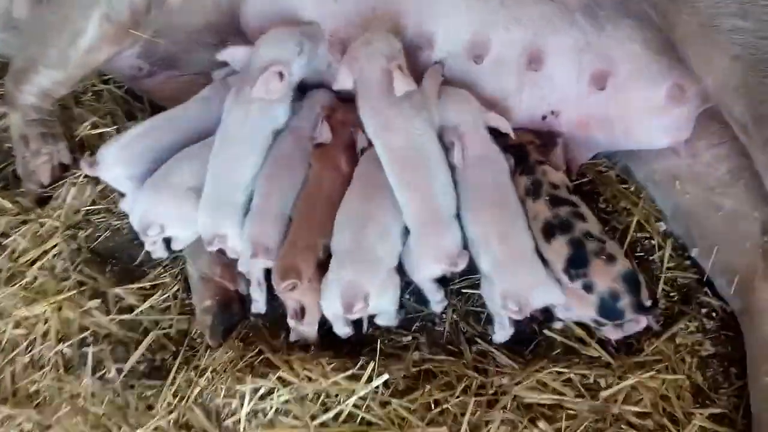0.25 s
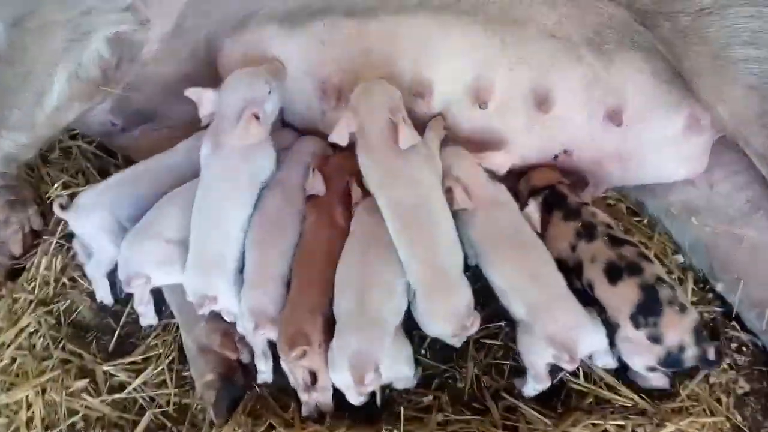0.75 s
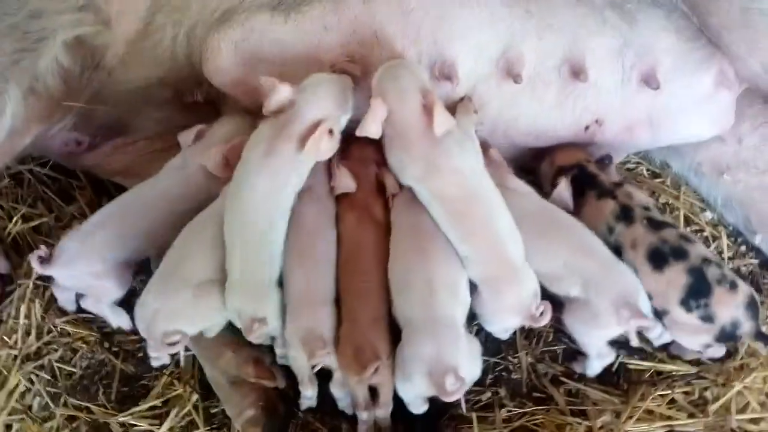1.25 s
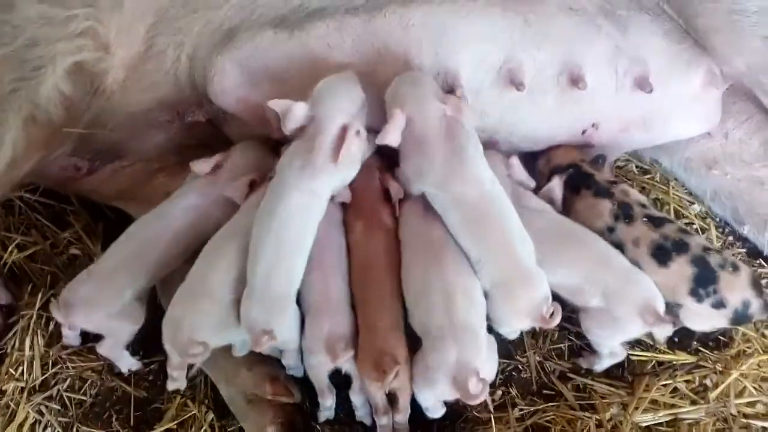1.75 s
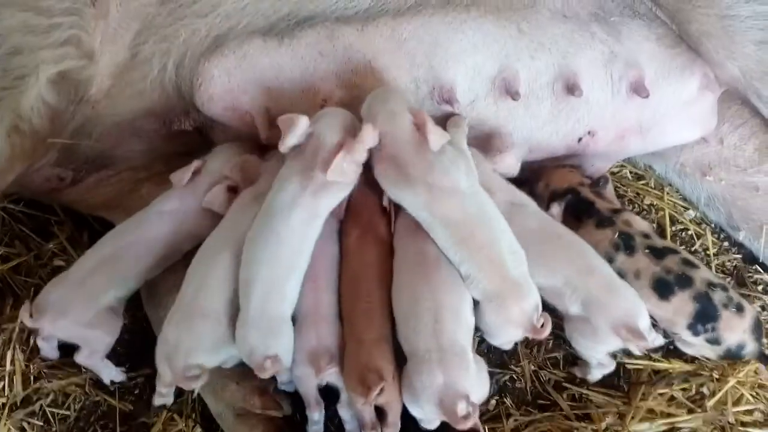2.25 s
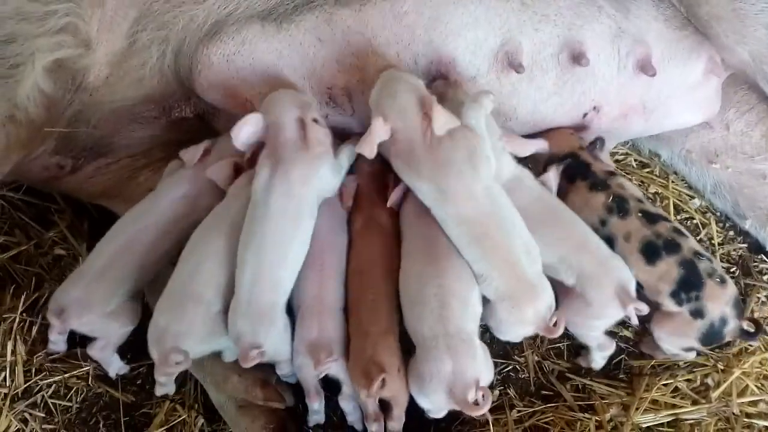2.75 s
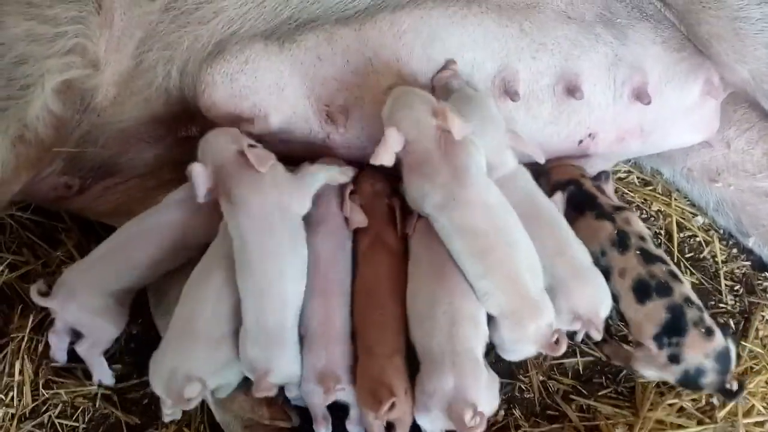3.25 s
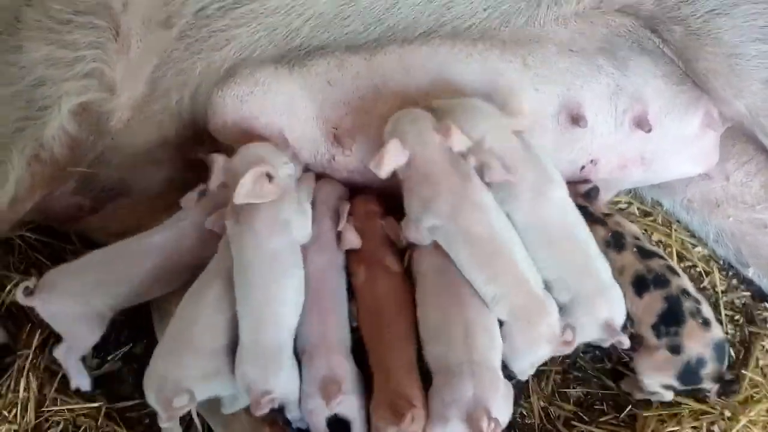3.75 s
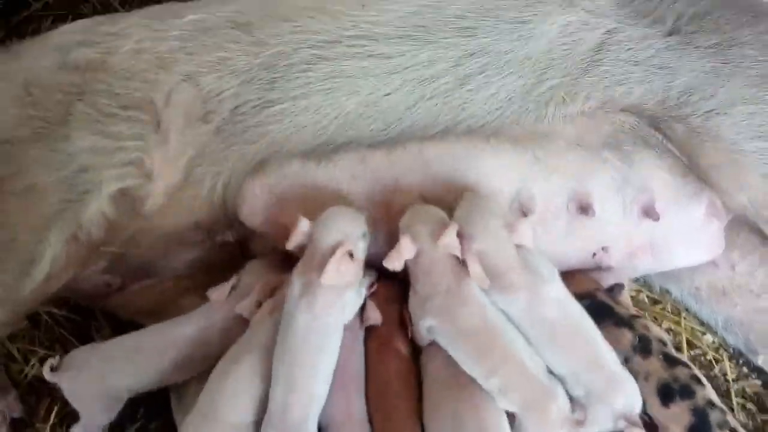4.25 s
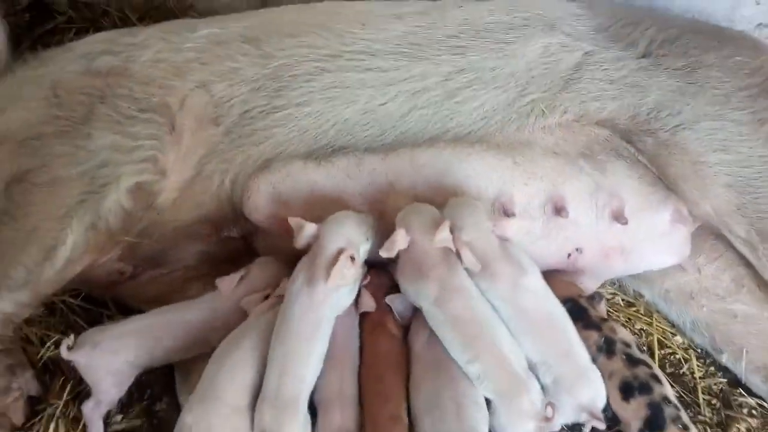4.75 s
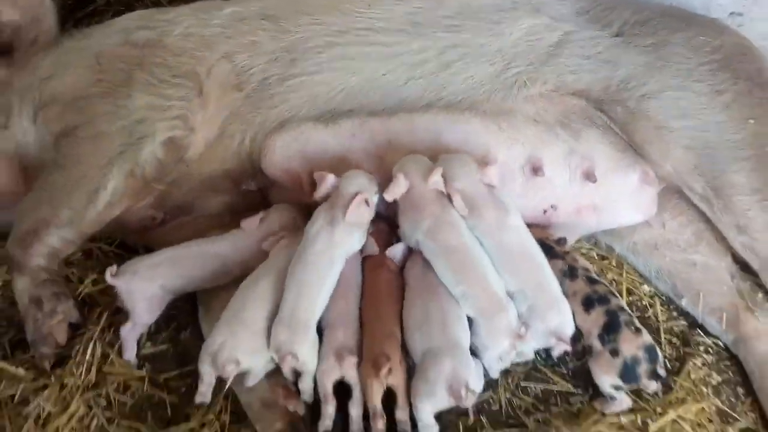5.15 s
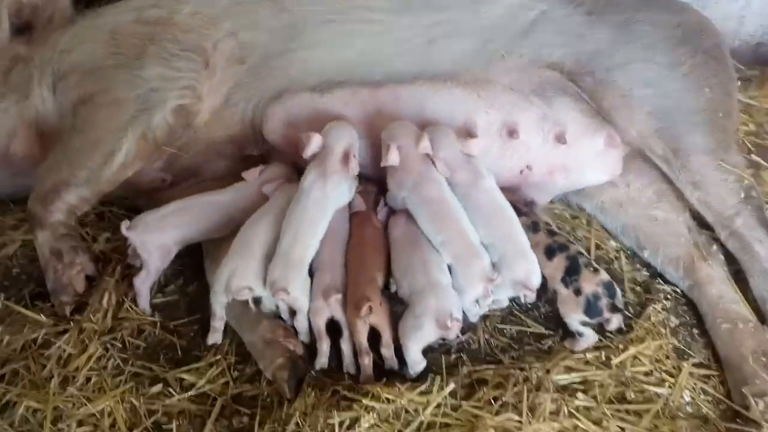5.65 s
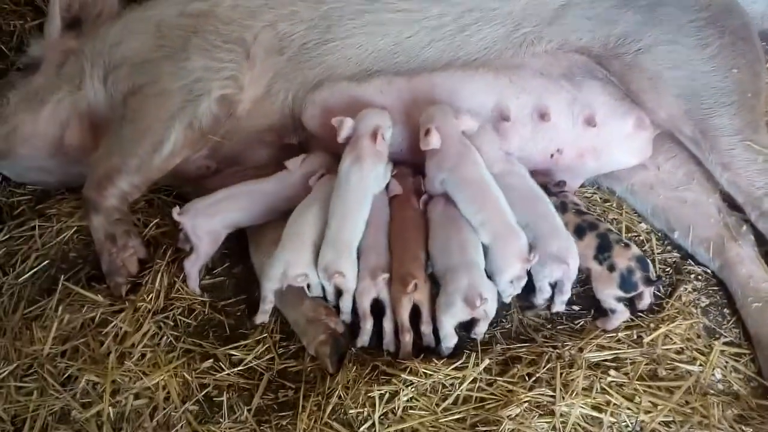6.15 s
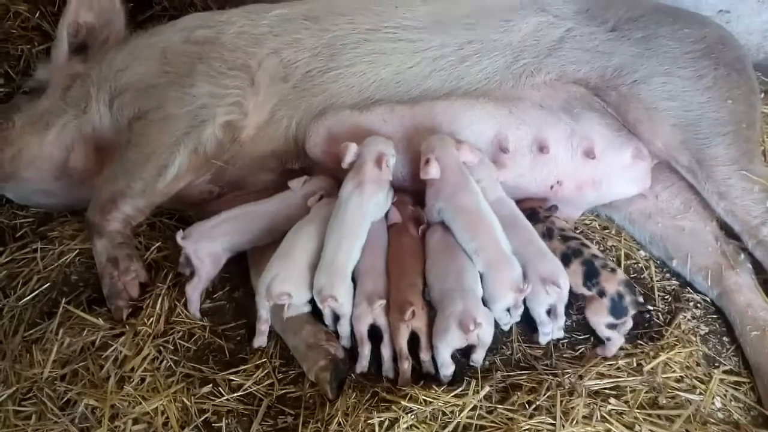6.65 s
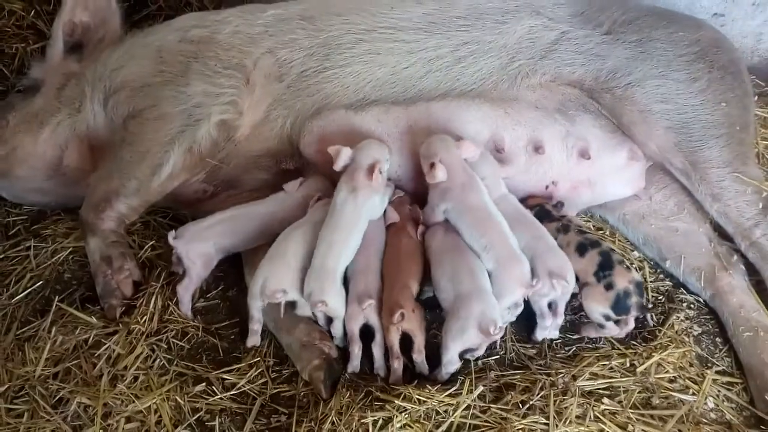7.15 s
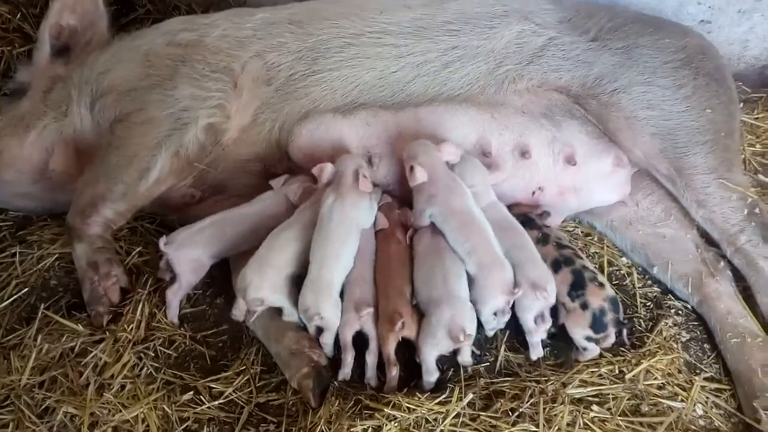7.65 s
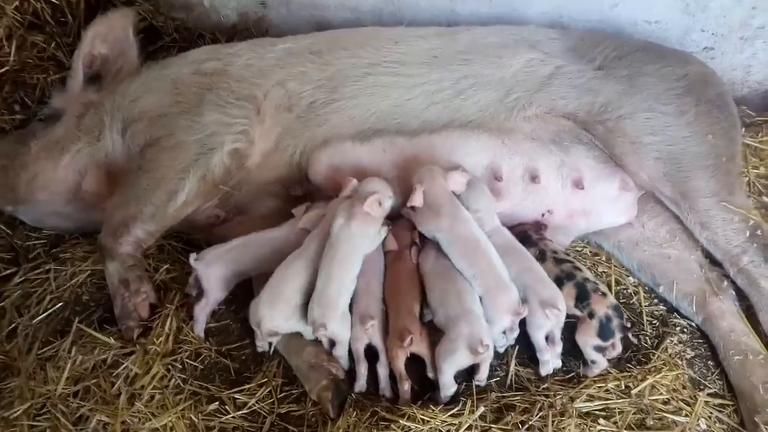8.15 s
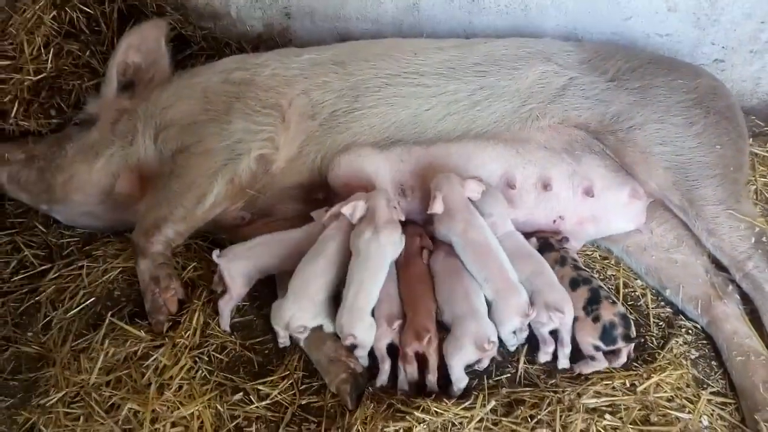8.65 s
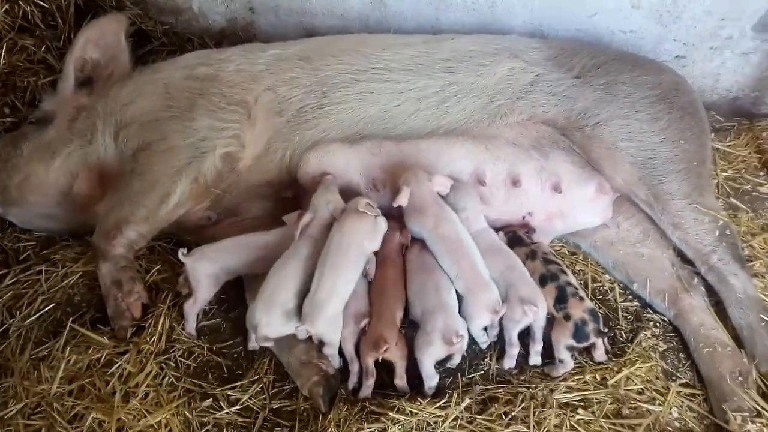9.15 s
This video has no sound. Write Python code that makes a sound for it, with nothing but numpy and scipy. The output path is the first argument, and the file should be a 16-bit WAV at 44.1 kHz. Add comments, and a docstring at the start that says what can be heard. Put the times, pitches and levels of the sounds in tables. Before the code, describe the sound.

Heard from above in a farm pen, a nursing sow makes deep, nasal grunts that start irregularly and settle into an even rhythm, about twice a second. Small nose whistles and breathy creaks go with them. Much quieter, her piglets smack now and then, rustle the straw and later give a few tiny husky grunts. The hard walls add a brief echo over a faint hum.

```python
"""A sow lies in straw and suckles her piglets, heard from above in a hard-walled pen with a faint hum.
Straw rustles, her nostril rings, and she starts grunting about twice a second. Each grunt is a short
run of slow throbs: it starts nasal, surges, opens to its peak and fades. The vowel swells and rises
in the first throbs, a slack throat sounds deeper, and her nose often chirps. Piglets shuffle, a soft
creak leads into most grunts, and the piglets smack at the teats, later giving a few small husky grunts."""
import sys
import numpy as np
from scipy import signal
from scipy.fft import rfft, irfft, next_fast_len
from scipy.io import wavfile
from scipy.ndimage import uniform_filter1d, map_coordinates

SR = 44100
rng = np.random.default_rng(int(sys.argv[2]) if len(sys.argv) > 2 else 0)


def transcribe(signal):
    """Save signal, clipped to [-1, 1], as a 16-bit WAV file at the path in sys.argv[1]."""
    frames = np.atleast_2d(signal).T
    limited = np.clip(frames, -1, 1)
    pcm = np.round(limited * 32767).astype(np.int16)
    wavfile.write(sys.argv[1], SR, pcm)


N = 414128

# the quiet of the barn: (frequency [Hz], level [dB])
AIR_TONE = [(15, -53), (25, -10), (136, 3), (1200, -7.5), (1570, -8), (1800, -9.5), (2170, -6), (2420, -13),
            (3000, -14.5), (4870, -17.5), (5580, -27), (8350, -32), (15500, -31)]
# stalks rubbing together: (frequency [Hz], level [dB])
SWISH_TONE = [(500, -0.5), (1500, 4.5), (2400, -7.5), (3600, -0.5), (5000, 1), (6500, -4), (7400, -12.5),
              (8200, -18.5), (11000, -26.5), (15000, -47)]
# dry stalks splintering: (frequency [Hz], level [dB])
SPLINTER_TONE = [(2000, -24.5), (4500, -2), (7000, 5), (11000, -8), (15000, -15)]
# a piglet shifts its feet: (loudest time [s], length [s], level [dB], crackle offset [dB])
FOOT_SHUFFLES = [(0.14, 0.2, -73, -19), (0.46, 0.69, -72.5, -21.5), (1.065, 0.11, -59, -6.5),
                 (1.325, 0.07, -61, -25.5), (1.589, 0.14, -57.5, -21.5), (1.97, 0.049, -66, -24),
                 (2.234, 0.17, -68.5, -16.5), (2.71, 0.19, -65.5, -19.5), (3.065, 0.1, -61.5, -22),
                 (3.451, 0.063, -57.5, -11), (3.558, 0.24, -70, -18.5), (3.878, 0.21, -65, -22.5),
                 (4.072, 0.079, -66, -13.5), (4.476, 0.36, -70, -22.5), (4.912, 0.08, -54.5, -13),
                 (5.191, 0.15, -68.5, -8), (5.584, 0.11, -70, -17.5), (6.007, 0.083, -68.5, -10.5),
                 (6.243, 0.033, -73, -17.5), (6.491, 0.089, -72.5, -9.5), (7.334, 0.056, -70.5, -2.5),
                 (7.758, 0.32, -69.5, -18.5), (8.586, 0.11, -61, -22.5), (8.889, 0.092, -63, -8.5),
                 (9.088, 0.1, -61.5, -22.5), (9.316, 0.057, -65.5, -23.5)]
# a narrowed nostril rings: (time [s], length [s], level [dB], pitch [Hz])
NOSTRIL_RINGS = [(0.0, 0.17, -53.5, 2650), (1.12, 0.091, -57, 2780)]
# the sow's grunts; "bite" is extra treble, and posture runs from 0 (nasal) through 1 (open) to 2 (slack):
# (start time [s], opening time [s], start level [dB], surge level [dB], open level [dB], drop after [dB],
#  start bite [dB], surge bite [dB], open bite [dB], brightness [dB], start posture, open posture,
#  start vowel ring [dB], surge vowel ring [dB])
SOW_GRUNTS = [(0.012, 0.09, -33, -24.5, -25, -8.5, 10, 2, 4.5, 2, 0.73, 0.93, -63, -50),
              (0.582, 0.656, -26.5, -30.5, -25.5, -13.5, 1.5, -1, -3, -9, 0.65, 0.79, -43.5, -44),
              (1.121, 1.197, -35.5, -27, -23.5, -18, 5.5, -3.5, 2, -7, 2.2, 1.6, -43, -44),
              (1.324, 1.41, -38, -39, -32.5, -8.5, 6, 1, 4, 4, 1.93, 1.9, -53, -52.5),
              (1.489, 1.567, -36.5, -38, -34.5, -3.5, 2, 11, -2, 7, 2.1, 1.95, -57.5, -49.5),
              (1.785, 1.864, -44, -31, -29, -5.5, 14, -1, 3, -2, 2, 2.1, -54, -53),
              (2.034, 2.112, -36.5, -34, -29.5, -13, 4, 1, 0.5, 1, 1.8, 1.58, -70, -58.5),
              (2.661, 2.737, -40, -30, -28.5, -3.5, 7, 3.5, 7.5, 10, 0.9, 1.25, -48, -47),
              (3.312, 3.387, -34, -27.5, -24, -1.5, 7.5, 0.5, 4.5, -5.5, 0.78, 1.05, -41, -42),
              (3.798, 3.873, -32, -26.5, -24, -11, -5.5, 2, 4, 7, 0.82, 0.9, -56.5, -48.5),
              (4.269, 4.344, -33.5, -29, -25.5, -7, -3.5, 1, 4.5, -1, 0.82, 1.1, -43.5, -41.5),
              (4.749, 4.824, -34.5, -27, -25, -17, 6.5, -0.5, 1.5, 7, 0.85, 0.98, -43, -45),
              (5.232, 5.304, -30, -26, -25, -15, -1, 4, 2, 4.5, 0.4, 1.2, -40, -40.5),
              (5.647, 5.723, -35, -27.5, -28.5, -0.5, 9, 1.5, 4, 4, 0.23, 0.97, -50, -42),
              (6.119, 6.193, -31, -23.5, -22.5, -14, -4, 1, 2.5, 8, 0.25, 1.15, -49, -46),
              (6.55, 6.617, -29.5, -26, -25.5, -12, 6, 2, 1, -3, 0.1, 1.08, -45, -45.5),
              (7.016, 7.091, -32, -24, -23, -15, -5, 1.5, 3, -2, 0.087, 0.96, -65, -43.5),
              (7.474, 7.546, -34, -23, -23.5, -9.5, -9, -3, 1.5, 1.5, 0.13, 1.02, -63, -43),
              (7.985, 8.06, -28.5, -23, -24, -19.5, -3.5, -3.5, 8, 4, 0.22, 1.1, -47.5, -39),
              (8.444, 8.515, -31, -24.5, -23.5, -13, -7, 1.5, -2, 8.5, 0.14, 1.02, -58.5, -41),
              (8.929, 9.003, -34.5, -24.5, -23, -14, 8.5, 5, -2, 6, 0.11, 0.9, -56, -39.5)]
# her resonances (pitches her throat rings at) in each posture: (frequency [Hz], width [Hz], level [dB])
NASAL_THROAT = [(80, 370, -12), (200, 130, -6.5), (355, 120, -6.5), (522.6, 110, -12), (779, 360, -18.5),
                (1083.6, 110, -20), (2358, 120, -29.5), (3500, 120, -59), (4570, 150, -35),
                (6030, 220, -45)]
OPEN_THROAT = [(87, 250, -8.5), (228.2, 73, -5), (405, 474, -15), (476.4, 114, -4.5), (936, 130, -18.5),
               (1525.6, 272, -24.5), (2625, 790, -39), (3570, 500, -39.5), (4435, 280, -38.5),
               (5860, 330, -42)]
SLACK_THROAT = [(80, 890, -17), (226, 60, -2.5), (337, 400, -11.5), (460, 100, -2), (903.6, 55, -12),
                (1722, 570, -27), (2960, 180, -39.5), (3480, 400, -34.5), (4600, 250, -50),
                (5760, 440, -42.5)]
# her nose flutters open: (time [s], level [dB], pitch [Hz])
NOSE_CHIRPS = [(0.089, -36, 3140), (0.654, -34.5, 3260), (1.125, -32.5, 4400), (1.189, -40, 4520),
               (1.198, -34, 3060), (1.226, -37.5, 4420), (1.33, -36.5, 3320), (1.447, -39, 3340),
               (1.488, -37, 3420), (1.53, -36, 3250), (1.571, -39, 3370), (1.603, -35, 3430),
               (1.787, -42.5, 3340), (1.865, -38, 3200), (2.076, -43.5, 2900), (2.115, -37.5, 3460),
               (2.78, -47.5, 3380), (3.349, -35, 4450), (3.386, -28.5, 4380), (3.424, -34.5, 2840),
               (3.874, -32, 4440), (3.915, -36, 3370), (4.307, -41, 2520), (4.347, -39, 3190),
               (4.386, -42, 2990), (4.788, -43, 2700), (5.306, -39.5, 3180), (8.057, -35, 3370),
               (9.004, -35, 4570)]
# creaks behind her closed mouth: (time [s], length [s], level [dB], bite [dB])
SOW_CREAKS = [(0.462, 0.037, -41.5, -2), (0.545, 0.032, -33.5, 0.5), (1.016, 0.06, -45, -6),
              (1.701, 0.51, -47, -9), (2.553, 0.11, -44.5, -10), (3.017, 0.14, -51.5, -9),
              (3.218, 0.084, -43, -2.5), (3.71, 0.15, -39.5, -3), (4.169, 0.041, -39.5, -1),
              (4.647, 0.24, -44, 4), (5.11, 0.12, -43, -4), (5.198, 0.039, -35.5, -5.5),
              (5.51, 0.21, -44.5, -4), (5.883, 0.17, -44.5, -11), (6.081, 0.031, -31.5, -2),
              (6.429, 0.14, -40.5, -1), (6.912, 0.19, -41.5, 0), (7.345, 0.12, -41.5, -7),
              (7.88, 0.033, -37.5, 0), (7.952, 0.032, -34, 5.5), (8.333, 0.083, -40.5, -4.5),
              (8.841, 0.086, -40, 5.5), (9.319, 0.081, -38.5, 4.5)]
# lip smacks and snapping stalks: (time [s], level [dB], pitch [Hz])
LIP_SMACKS = [(0.467, -51, 4300), (0.846, -38, 3920), (1.014, -34, 1600), (1.023, -42, 5440),
              (2.516, -40.5, 4500), (4.031, -51, 3700), (5.077, -39, 1220), (6.913, -57, 4620),
              (7.313, -42, 4700), (7.419, -44, 4630), (7.694, -51, 4000), (9.299, -58, 5000)]
# piglet grunts: (time [s], length [s], level [dB], pulse rate [1/s])
PIGLET_GRUNTS = [(3.005, 0.046, -45.5, 152), (3.028, 0.037, -40.5, 253), (4.908, 0.022, -60, 190),
                 (5.514, 0.043, -51.5, 110), (5.929, 0.027, -44.5, 190), (6.845, 0.015, -52, 70),
                 (7.72, 0.015, -45.5, 223)]
# a piglet's throat: (frequency [Hz], width [Hz], level [dB])
SMALL_THROAT = [(616, 230, 9), (1000, 1200, -3.5), (1560, 350, -10), (1710, 170, -5.5), (4020, 500, -32)]
# how long the pen echoes: (frequency [Hz], time to fade by 60 dB [s])
ECHO_FADE = [(60, 0.81), (230, 0.8), (500, 0.4), (1000, 0.45), (3000, 0.32), (6000, 0.37), (12000, .2)]
# straw soaks up the treble of the echo: (frequency [Hz], level [dB])
ECHO_TONE = [(100, 1.5), (500, 0.5), (1500, -0.5), (3500, 0.5), (8000, -9)]
# low notes that linger between the walls: (pitch [Hz], time to fade by 60 dB [s], level [dB])
STANDING_WAVES = [(67.4, 0.62, -9.5), (115.1, 1.0, -6.5), (233.24, 0.29, -9.5), (475, 0.23, -21.5)]


def amp(db):
    """Turn decibels into a number to multiply by."""
    return 10 ** (np.asarray(db) / 20)


def unit(x):
    """Scale a signal to an average power of 1."""
    return x / np.sqrt(np.mean(x ** 2) + 1e-20)


def along(points, hz):
    """Read between (frequency, value) points on a log frequency axis."""
    f, v = np.transpose(points)
    return np.interp(np.log(hz + 1), np.log(f + 1), v)


def filtered(x, response):
    """Multiply each frequency in x by response(hz)."""
    size = next_fast_len(N + SR // 2)
    return irfft(rfft(x, size) * response(np.fft.rfftfreq(size, 1 / SR)), size)[..., :N]


def coloured(noise, tone):
    """Shape noise with a tone table; average power 1."""
    return unit(filtered(noise, lambda hz: amp(along(tone, hz))))


def add(track, s, sound):
    """Mix a sound into a track at s seconds."""
    part = track[max(0, round(s * SR)):][:len(sound)]
    part += sound[:len(part)]


def diffuse(pair, alike_hz=620):
    """Sound from all around: left and right are alike in the bass, unrelated in the treble."""
    turn = np.arccos(np.sinc(np.fft.rfftfreq(pair.shape[1], 1 / SR) / (2 * alike_hz))) / 2
    mid, side = irfft(rfft(pair) * [np.cos(turn), np.sin(turn)], pair.shape[1])
    return np.array([mid + side, mid - side])


def barn(air_db=-64, hum_db=-68, hum_hz=118):
    """Still barn air with a faint hum."""
    air = coloured(diffuse(rng.standard_normal((2, N))), AIR_TONE)
    return amp(air_db) * air + amp(hum_db) * np.sin(2 * np.pi * hum_hz * np.arange(N) / SR)


def shuffling(rise_share=0.38, fall_share=0.66, fidget_db=-82, swing_db=9.5, changes_per_s=13):
    """Strength of the rustle and its crackle: each shuffle swells and settles over constant fidgeting."""
    t = np.arange(N) / SR
    fidget = np.tanh(map_coordinates(rng.standard_normal(256), [t * changes_per_s], mode="mirror"))
    rustle, crackle = amp(fidget_db + swing_db * fidget) ** 2, 0
    for s, length, db, crackle_db in FOOT_SHUFFLES:
        from_peak = np.maximum((s - t) / rise_share, (t - s) / fall_share) / length
        power = (amp(db) * np.exp(-from_peak ** 1.01)) ** 2
        rustle += power
        crackle += power * amp(crackle_db) ** 2
    return np.sqrt(rustle), np.sqrt(crackle)


def cracks(per_s, spread_db=4):
    """Stalks crack at random moments, a few much louder than the rest."""
    clicks = (rng.random(N) < per_s / SR) * rng.standard_normal(N)
    return unit(clicks * amp(spread_db * np.minimum(rng.exponential(size=N), 3)))


def straw(swish_db=12, splinter_db=7, cracks_per_s=900, splinters_per_s=1400):
    """Feet and bellies drag over stalks: tiny cracks on a soft swish, and splinters under harder steps."""
    swish = cracks(cracks_per_s) + 2.95 * rng.standard_normal((2, N))
    middle, left, right = (cracks(splinters_per_s) for _ in range(3))
    splinters = middle + np.array([left, right])
    rustle, crackle = shuffling()
    return (amp(swish_db) * rustle * coloured(swish, SWISH_TONE)
            + amp(splinter_db) * crackle * coloured(splinters, SPLINTER_TONE))


def pulse(resonances, mouth_db=0, bite_db=0, chest_db=0, rough=1, puff_s=0.0065, size=2048):
    """One slap of the vocal folds and its puff of air, ringing through the throat; energy 1."""
    hz, t = np.fft.rfftfreq(size, 1 / SR), np.arange(size) / SR
    power = sum(amp(db) ** 2 / (1 + (2 * (hz - centre) / width) ** 2) ** 2
                for centre, width, db in resonances)
    tone = [(40, chest_db - 12.5), (64, chest_db - 3.5), (100, chest_db - 2.5), (190, 0.44), (290, 1.4),
            (420, -0.75), (550, -1.4), (800, mouth_db), (1750, mouth_db), (2300, bite_db)]
    # these two steps make the throat ring after the slap, never before it
    cepstrum = irfft(np.log(np.sqrt(power) * amp(along(tone, hz)) + 1e-6))
    throat = np.exp(rfft(2 * cepstrum[:size // 2], size))
    breath = rng.standard_normal(size) * np.exp(-t / puff_s)
    breath_tone = along([(300, 0.77), (1500, 1.02), (4000, 1.6)], hz)
    puff = rough * rfft(breath / np.linalg.norm(breath)) * breath_tone
    ring = irfft(throat * (1 + puff))
    return ring / np.linalg.norm(ring)


def rattle(length, per_s, levels_db, make_pulse, jitter=0.24, scatter_db=1.5):
    """A run of uneven pulses whose level slides from the first of levels_db to the second."""
    gaps = np.exp(jitter * rng.standard_normal(64)) / per_s
    times = np.append(0, np.cumsum(gaps))
    run = np.zeros(round(length * SR) + SR // 10)
    for s in times[times < length]:
        db = np.interp(s, [0, length], levels_db) + scatter_db * rng.standard_normal()
        add(run, s, amp(db) * make_pulse())
    energy = np.sum(amp(np.linspace(*levels_db, round(length * SR))) ** 2)
    return run * np.sqrt(energy / np.sum(run ** 2))


def nostril_ring(length, db, hz, pulses_per_s=85):
    """A narrowed nostril rings at one pitch and the octave above, fading fast."""
    nostril = [(hz, 60, 0), (2 * hz, 200, along([(5300, -10.5), (7000, -28)], 2 * hz))]
    return rattle(length, pulses_per_s, [db + 16, db - 16], lambda: pulse(nostril))


def sow_throat(posture, gape=1, bright_db=0, nose_tuning=1):
    """Her resonances blend from nasal through open to slack; wider lips (gape) raise the vowel."""
    nasal, wide, slack = np.array([NASAL_THROAT, OPEN_THROAT, SLACK_THROAT])
    resonances = nasal + min(posture, 1) * (wide - nasal) + max(posture - 1, 0) * (slack - wide)
    resonances[4:6, 0] *= gape  # the two vowel resonances
    resonances[6:, 0] *= nose_tuning  # the four nose resonances
    resonances[6:, 2] += bright_db * np.array([-0.5, 0, 0.5, 0])
    return resonances


def climb(sound, nose_hz=2000, close_s=0.00087, rise_share=0.12, rise_s=0.0069):
    """The folds close softly and the low resonances sweep up as they part; the bony nose rings steadily."""
    t = np.arange(len(sound)) / SR
    throat, nose = (signal.sosfilt(signal.butter(6, nose_hz, kind, fs=SR, output="sos"), sound)
                    for kind in ("low", "high"))
    speed = 1 + rise_share * (1 / 4 - np.exp(-t / rise_s))
    swept = map_coordinates(throat, [np.cumsum(speed)])
    throb = swept * (1 - np.exp(-t / close_s)) + 0.73 * nose
    return throb / np.linalg.norm(throb)


def vowel_ring(resonances, length, rough=0.23, rise_share=0.15, lower_db=1.5):
    """Air flows late in a throb: the two vowel resonances swell and rise."""
    progress = np.linspace(0, 1, round(length * SR))
    swell = np.sin(np.pi * progress ** 1.2) ** 1.6
    ring = 0
    for hz, db in zip(resonances[4:6, 0], (lower_db, 0)):
        flutter = rough * unit(uniform_filter1d(rng.standard_normal((2, len(progress))), size=220))
        pitch = hz * (1 + rise_share * (progress - 0.5))
        phase = 2 * np.pi * (rng.random() + np.cumsum(pitch) / SR)
        tone = swell * ((1 + flutter[0]) * np.sin(phase) + flutter[1] * np.cos(phase))
        ring += amp(db) * tone / np.linalg.norm(tone)
    return ring


def grunt(start, opening, start_db, surge_db, open_db, drop_db, start_bite_db, surge_bite_db,
          open_bite_db, bright_db, posture, open_posture, start_ring_db, surge_ring_db):
    """Throbs as (time, sound): a nasal one, a surge as the jaw drops, the open burst and four that fade."""
    gap = (opening - start) / 2
    chest_db, mouth_db = -1.5 + 6.5 * posture, 4 + 0.55 * posture  # a slack throat has more bass
    lips = 1 + 0.056 * max(1 - posture, 0)
    surge_posture = posture + 0.13 * (open_posture - posture)

    def throb(db, pose, bite_db, gape=1, vowel_db=0):
        throat = sow_throat(pose, gape, bright_db, nose_tuning=rng.normal(1, 0.021))
        bite_db += rng.normal(0, 1.3)  # some slaps close harder than others
        slap = pulse(throat, mouth_db + vowel_db, bite_db, chest_db, rough=0.79, puff_s=0.0067)
        return amp(db) * np.sqrt(gap * SR) * climb(slap)

    def ring(db, pose, gape=1):
        return amp(db) * np.sqrt(gap * SR) * vowel_ring(sow_throat(pose, gape), gap)

    fading = [(opening + (k + 1) * gap + rng.normal(0, 0.003),
               throb(open_db + drop_db - 7 * k, open_posture, open_bite_db - 0.5)) for k in range(4)]
    return [(start, throb(start_db, posture, start_bite_db, 1 / lips, vowel_db=-3)),
            (start, ring(start_ring_db, posture)),
            (start + gap, throb(surge_db, surge_posture, surge_bite_db, lips, vowel_db=-2)),
            (start + gap, ring(surge_ring_db, surge_posture, lips)),
            (opening, throb(open_db, open_posture, open_bite_db)),
            (opening, ring(surge_ring_db - 5.5, open_posture, lips))] + fading


def nose_chirp(hz, length=0.0076, rise_share=0.21):
    """Her nose flutters open with a short rising whistle."""
    progress = np.linspace(0, 1, round(length * SR))
    pitch = hz * (1 + rise_share * (progress - 0.5))
    return np.sin(np.pi * progress) ** 2 * np.sin(2 * np.pi * np.cumsum(pitch) / SR)


def creak(length, db, bite_db, pulses_per_s=42):
    """A soft, breathy rattle behind a closed mouth."""
    throat = sow_throat(posture=0.048)
    slap = lambda: pulse(throat, mouth_db=-9, bite_db=rng.normal(bite_db, 0.5), chest_db=-3)
    return rattle(length, pulses_per_s, [db, db - 2], slap, jitter=0.2)


def smack(hz):
    """A wet smack at a teat or a snapping stalk: one noisy pop."""
    pop = pulse([(hz, hz * 0.83, 0), (4200, 3000, -27)], rough=8.1)
    return pop / np.abs(pop).max()


def piglet_grunt(length, db, pulses_per_s):
    """Quick, uneven slaps in a small throat sound husky."""
    slap = lambda: pulse(SMALL_THROAT, rough=0.9)
    return rattle(length, pulses_per_s, [db + 6, db - 0.5], slap, jitter=0.47)


def sow():
    """All the sounds of her throat and nose on one track."""
    track = np.zeros(N)
    for row in SOW_GRUNTS:
        for s, sound in grunt(*row):
            add(track, s, sound)
    for s, length, db, bite_db in SOW_CREAKS:
        add(track, s, creak(length, db, bite_db))
    for s, length, db, hz in NOSTRIL_RINGS:
        add(track, s, nostril_ring(length, db, hz))
    for s, db, hz in NOSE_CHIRPS:
        add(track, s, amp(db) * nose_chirp(hz))
    return track


def piglets():
    """Their grunts and smacks on one track."""
    track = np.zeros(N)
    for s, length, db, pulses_per_s in PIGLET_GRUNTS:
        add(track, s, piglet_grunt(length, db, pulses_per_s))
    for s, db, hz in LIP_SMACKS:
        add(track, s, amp(db) * smack(hz))
    return track


def pen_echo(sound, echo_db=0.46, hum_db=20.5, build_s=0.0053, early_s=0.04):
    """Hard walls answer with a dense echo, and a few low standing waves hum on."""
    hz, t, noise = signal.stft(rng.standard_normal((2, SR)), SR, nperseg=256)
    fade = amp(-60 * t / along(ECHO_FADE, hz)[:, None])
    tail = signal.istft(noise * fade, SR, nperseg=256)[1][:, :SR]
    t = np.arange(SR) / SR
    early_boost = 1 + 0.94 * np.exp(-t / early_s)
    build_up = 1 - np.exp(-(t / build_s) ** 2)
    spectrum = rfft(tail * early_boost * build_up)
    spectrum /= np.sqrt(np.abs(uniform_filter1d(np.abs(spectrum) ** 2, size=30)))  # even out the bands
    echo = diffuse(irfft(spectrum * amp(along(ECHO_TONE, np.fft.rfftfreq(SR, 1 / SR)))))
    hum = sum(amp(db - 60 * t / fade_s) * np.cos(2 * np.pi * pitch * t) * 2 * np.log(1000) / (fade_s * SR)
              for pitch, fade_s, db in STANDING_WAVES)
    answer = amp(echo_db) * echo + amp(hum_db) * hum
    return signal.fftconvolve(np.atleast_2d(sound), answer, axes=1)[:, :N]


def scene(lag_s=0.00029):
    """The sow's voice reaches the right side first; piglets and straw lie straight ahead."""
    voice, litter = amp(-3) * sow(), piglets()
    delays_s = np.array([[lag_s], [-lag_s]]) / 2  # left, right
    direct = filtered(voice, lambda hz: np.exp(-2j * np.pi * hz * delays_s))
    animals = amp(-4.5) * direct + amp(-6.5) * litter + pen_echo(voice + amp(-1.5) * litter)
    balance = amp([[-1], [1]])  # a little louder on the right
    return balance * animals + straw() + barn()


def record(dry, low_hz=59, top_hz=15500):
    """The microphone sheds the deepest bass and keeps nothing above top_hz."""
    thinned = signal.sosfilt(signal.butter(3, low_hz, "high", fs=SR, output="sos"), dry)
    return filtered(thinned, lambda hz: hz < top_hz)


dry = scene()
out = record(dry)
transcribe(out)
```